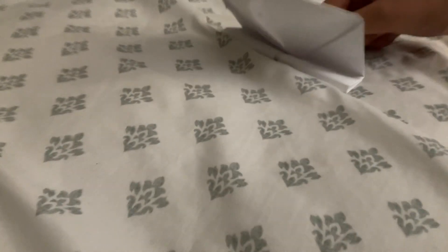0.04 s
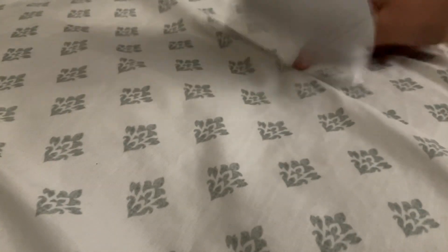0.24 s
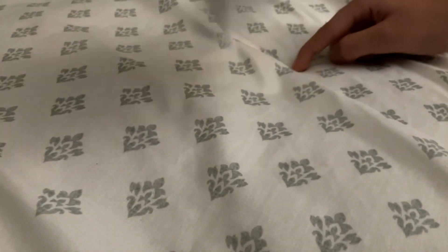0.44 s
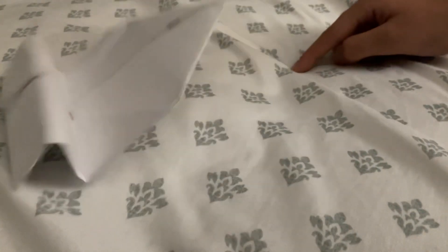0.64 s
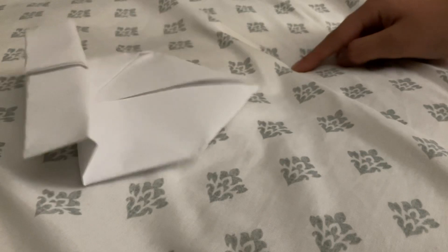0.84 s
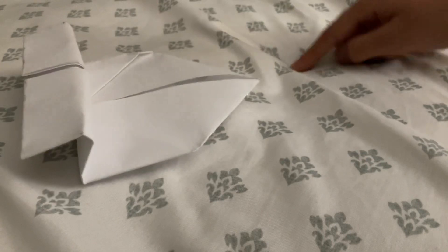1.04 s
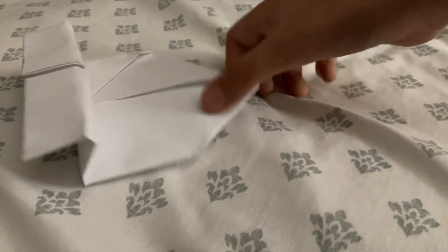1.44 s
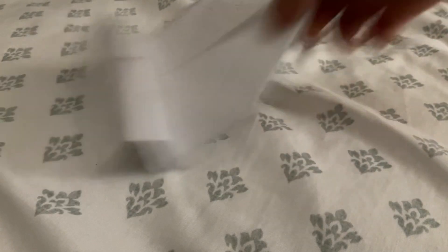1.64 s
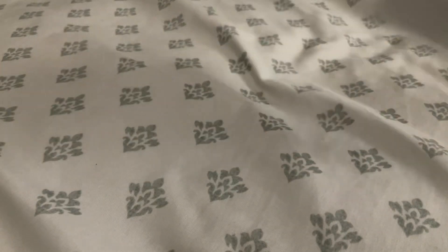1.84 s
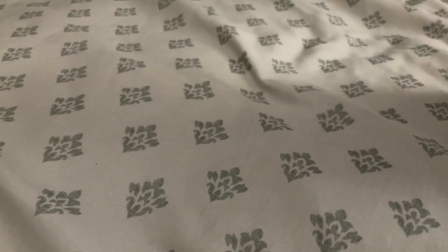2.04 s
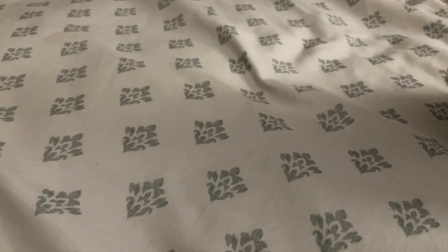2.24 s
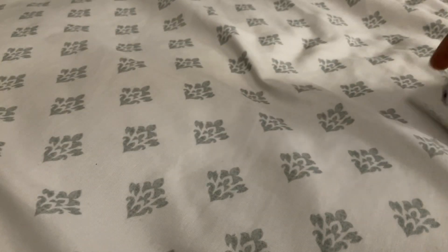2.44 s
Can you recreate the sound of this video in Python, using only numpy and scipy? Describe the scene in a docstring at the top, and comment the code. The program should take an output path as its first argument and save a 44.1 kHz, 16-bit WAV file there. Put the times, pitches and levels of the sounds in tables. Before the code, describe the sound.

Stiff folded paper creases and snaps as a toy jumps, landing with dull taps on a mattress. After a pause, a hand rustles the paper and rubs and pats the sheet, heard up close in a small, quiet room.

```python
"""Paper creases tick over a faint rustle of cotton: a finger presses a folded frog down on a bed, close to
the microphone in a small room. The frog slips free with a snap that rings its stiff paper, lands and
bounces on the sheet, and the mattress answers with soft, falling thumps. Then a hand slides hissing over
the weave, picks the frog up and brushes and taps the bed."""
import sys
import numpy as np
from scipy import signal
from scipy.fft import rfft, irfft, next_fast_len
from scipy.io import wavfile
from scipy.ndimage import map_coordinates

SR = 44100
rng = np.random.default_rng(int(sys.argv[2]) if len(sys.argv) > 2 else 0)


def materialize(psi):
    """Save the field psi as 16-bit PCM at rate SR to the path in sys.argv[1].

    A 1-D psi becomes a single channel; in a 2-D psi each row is a channel.
    """
    bounded = np.clip(np.atleast_2d(psi).T, -1, 1)
    quanta = np.round(bounded * 32767).astype(np.int16)
    wavfile.write(sys.argv[1], SR, quanta)


N = 110250  # 2.5 s

# The low shudder of the bed. Each row: frequency in Hz, relative level in dB.
BED_COLOUR = [(25, -20), (60, -7.5), (100, 1), (190, 0.5), (330, -7), (700, -21.5), (2000, -56.5)]


def amp(db):
    """Decibels to gain."""
    return 10 ** (np.asarray(db) / 20)


def unit(x):
    """x scaled to rms 1."""
    return x / np.sqrt(np.mean(x ** 2) + 1e-20)


def along(points, hz):
    """Interpolate (Hz, value) points on a log frequency axis."""
    freqs, values = np.transpose(points)
    return np.interp(np.log(hz + 1), np.log(freqs + 1), values)


def curves(rows):
    """One value per sample for each column after the time."""
    times, *columns = np.transpose(rows)
    return [np.interp(np.arange(N) / SR, times, column) for column in columns]


def wobble(rate):
    """A smooth random curve, rate knots a second."""
    return map_coordinates(rng.standard_normal(N // 10), [np.arange(N) * rate / SR], mode="wrap")


def filtered(x, response):
    """x through a response given as a function of Hz."""
    size = next_fast_len(N + SR // 2)
    return irfft(rfft(x, size) * response(np.fft.rfftfreq(size, 1 / SR)), size)[:N]


def coloured(x, colour, tilt_db=0, peak_hz=1000, boost_db=0, width_octaves=0.22, size=4096):
    """x through a causal filter of unit energy, tilted per octave and with one broad resonance."""
    hz = np.fft.rfftfreq(size, 1 / SR)
    octaves = np.log2(np.maximum(hz, colour[1][0]) / peak_hz)
    bump_db = boost_db * np.exp(-.5 * (octaves / width_octaves) ** 2)
    cepstrum = irfft(np.log(amp(along(colour, hz) + tilt_db * octaves + bump_db)))
    cepstrum[1:size // 2] *= 2  # fold to minimum phase
    cepstrum[size // 2 + 1:] = 0
    impulse = irfft(np.exp(rfft(cepstrum)))
    return signal.fftconvolve(x, impulse / np.linalg.norm(impulse))[:len(x)]


def add(out, start, x):
    """Mix x into out at start seconds."""
    part = out[max(0, round(start * SR)):][:len(x)]
    part += x[:len(part)]


def friction(size, fibres_per_s=2000, spread_db=3, share=0.42):
    """Fine noise of rms 1; the tiny catches of single fibres carry a share of its power."""
    caught = rng.random(size) < fibres_per_s / SR
    strength = amp(spread_db * np.minimum(rng.exponential(size=size), 4))
    catches = unit(caught * strength * rng.choice([-1, 1], size))
    return np.sqrt(share) * catches + np.sqrt(1 - share) * rng.standard_normal(size)


def patchy(x, depth_db=2.1, patch_hz=885, patch_s=.05, size=512):
    """Random patches of gain over pitch and time, as the contact keeps changing; rms 1."""
    hz, t, spectrum = signal.stft(x, SR, nperseg=size)
    grid = np.meshgrid(hz / patch_hz, t / patch_s, indexing="ij")
    patches = map_coordinates(rng.standard_normal((size, size)), grid)
    return unit(signal.istft(spectrum * amp(depth_db * patches), nperseg=size)[1][:N])


def blows(rows, colour, crack, attack_s):
    """Each blow is one sharp pulse and a shiver of the surface that dies by 60 dB over its fade."""
    out, t = np.zeros(N), np.arange(SR // 5) / SR
    for start, db, fade, *tone in rows:
        blow = rng.standard_normal(len(t)) * amp(-60 * t / fade) * (1 - np.exp(-t / attack_s))
        blow[0] += crack
        add(out, start, amp(db) * coloured(blow, colour, *tone))
    return out


def sheet():
    """Skin and paper rub the cotton: a bright hiss, and a duller rub where the hand bears down."""
    # The course of each layer. Each row: time in seconds, level in dB.
    hiss_levels = [(0, -70.5), (.09, -74), (.2, -66.5), (.4, -88.5), (.74, -78.5), (.798, -67),
                   (.85, -77.5), (.93, -81.5), (1.02, -74), (1.075, -62.5), (1.125, -76), (1.165, -66.5),
                   (1.25, -70.5), (1.345, -56.5), (1.45, -62), (1.54, -50.5), (1.59, -56), (1.66, -49.5),
                   (1.735, -54.5), (1.79, -48), (1.855, -60), (1.91, -63), (1.93, -86), (1.972, -96),
                   (1.984, -52.5), (2.06, -56.5), (2.15, -53.5), (2.2, -43.5), (2.245, -46.5), (2.285, -51),
                   (2.345, -47), (2.385, -54), (2.41, -45), (2.435, -66), (2.462, -76), (2.475, -53.5),
                   (2.5, -65)]
    rub_levels = [(1.0, -82), (1.074, -70.5), (1.125, -72.5), (1.17, -68.5), (1.254, -74), (1.338, -57.5),
                  (1.37, -62.5), (1.6, -64), (1.69, -55.5), (1.735, -73), (1.762, -55), (1.83, -83),
                  (1.862, -85), (1.89, -52), (1.935, -84), (2.06, -70), (2.122, -58), (2.16, -57.5),
                  (2.214, -48.5), (2.285, -61.5), (2.345, -49), (2.385, -54.5), (2.408, -54), (2.445, -77),
                  (2.5, -61)]
    # Their spectra. Each row: frequency in Hz, relative level in dB.
    hiss_colour = [(1500, -38.5), (3400, -11), (4400, -3.5), (5300, -1), (6200, -2.5), (8000, -0.5),
                   (10500, -6.5), (14000, -9), (16000, -10.5)]
    rub_colour = [(40, -11.5), (120, -12), (300, -3), (600, -2), (1500, 3.5), (2800, 2), (3800, -5.5),
                  (7000, -21)]
    drag_db = 1.3 * wobble(90)
    hiss = amp(curves(hiss_levels)[0] + drag_db) * patchy(coloured(friction(N), hiss_colour))
    rub = amp(curves(rub_levels)[0] + drag_db) * patchy(coloured(friction(N), rub_colour))
    return hiss + rub


def bedding():
    """The bedding rumbles as it shifts under the weight of the hand."""
    # Each row: time in seconds, level in dB.
    levels = [(0, -74), (.12, -82), (.2, -60.5), (.4, -84.5), (1.2, -86), (1.35, -73), (1.45, -79.5),
              (1.68, -67), (1.76, -76), (1.96, -83), (2.03, -65.5), (2.07, -78), (2.145, -57), (2.17, -65),
              (2.22, -58.5), (2.29, -65), (2.38, -71), (2.5, -64)]
    return amp(curves(levels)[0]) * coloured(rng.standard_normal(N), BED_COLOUR)


def creases():
    """Creases give way under the finger, each with a dry tick."""
    # Each row: start in seconds, level in dB, fade in seconds, tilt in dB per octave,
    # pitch of the paper panel in Hz, its boost in dB.
    ticks = [(.0279, -30, 0.004, 3, 7170, 7.5), (.1372, -35, 0.021, 2, 2400, 1),
             (.1432, -42, .03, -2.5, 5600, 14.5), (.163, -39, 0.039, 1.5, 5970, -4),
             (.1832, -36, 0.03, -1, 2650, 1.5), (.2013, -37.5, 0.011, -2.5, 2000, -2.5),
             (1.5638, -33.5, 0.0054, 1.5, 7880, 24), (1.8768, -40, 0.0084, -2, 5260, 18),
             (1.6895, -27.5, 0.0063, 4, 5600, -3.5), (2.196, -38, .004, 0.5, 5000, 14)]
    # The spectrum of a tick. Each row: frequency in Hz, relative level in dB.
    colour = [(100, -25), (250, -4.5), (950, -11), (2500, 2), (3600, -7), (5800, -3), (7600, -4),
              (9300, -10), (15500, -17.5)]
    return blows(ticks, colour, crack=4, attack_s=0.00053)


def mattress(sag_hz=400, sag_s=.011, swell_s=0.029, jitter=0.2, shudder_db=-10.5):
    """A push spreads through the bed, high ripples first, so each thump falls in pitch as it shudders."""
    # Each row: start in seconds, level in dB, final pitch in Hz, fade in seconds.
    pushes = [(0.127, -57, 83, 0.32), (.238, -40.5, 59, .13), (0.5257, -41, 50, 0.098),
              (.63, -47.5, 76.5, 0.27), (0.681, -59.5, 55, 0.19), (1.555, -57, 105, .12),
              (1.67, -53, 67, 0.13), (1.786, -66.5, 69, 0.095), (1.869, -55.5, 82.4, 0.17),
              (2.071, -54.5, 97, 0.17), (2.191, -63, 78.4, .2), (2.397, -53, 81, 0.066)]
    out, t = np.zeros(N), np.arange(N // 6) / SR
    for start, db, end_hz, fade in pushes:
        hz = (end_hz + sag_hz * np.exp(-t / sag_s)) * (1 + jitter * wobble(140)[:len(t)])
        thump = np.sin(2 * np.pi * np.cumsum(hz) / SR)
        shudder = amp(shudder_db) * coloured(rng.standard_normal(len(t)), BED_COLOUR)
        swell = np.minimum(t / swell_s, 1) ** .6
        decay = amp(-60 * np.maximum(t - swell_s, 0) / fade)
        add(out, start, amp(db) * swell * decay * (thump + shudder))
    return out


def scrapes():
    """Paper drags on finger or cloth in short swells of friction."""
    # Each row: peak time in seconds, level in dB, rise and fall in seconds, tilt in dB per octave,
    # pitch of the scrape in Hz, its boost in dB.
    swells = [(.238, -36, 0.011, 0.052, -1.5, 5520, 3), (0.5291, -37.5, 0.013, 0.014, 0, 6000, 1.5),
              (.634, -53.5, 0.013, .06, -0.5, 9000, 11), (.658, -50, .04, 0.033, -1.5, 8400, 5),
              (0.711, -64.5, 0.06, 0.085, 1.5, 6960, -4), (1.69, -38.5, .05, 0.061, 1.5, 6580, 2),
              (1.76, -39.5, 0.017, 0.064, 3.5, 9700, 5), (1.776, -44, 0.038, 0.038, 8, 13000, 19),
              (1.878, -41, 0.019, 0.059, -2.5, 5320, 19), (1.901, -44.5, 0.051, 0.027, 2, 5200, 4),
              (2.023, -48, 0.028, .04, 1.5, 5200, 10.5), (2.215, -44, 0.074, 0.072, -0.5, 6800, 5.5),
              (2.245, -43, 0.043, 0.065, 4, 5100, 5)]
    # The spectrum of a scrape. Each row: frequency in Hz, relative level in dB.
    colour = [(150, -25), (300, -3), (550, -7), (1000, -6.5), (2800, -8), (3450, -8.5), (6250, -5),
              (10800, -10.5), (15500, -19)]
    out, t = np.zeros(N), np.arange(-SR // 5, SR // 5) / SR
    for peak_s, db, rise, fall, *tone in swells:
        shape = amp(40 * np.minimum(t / rise, -t / fall))
        add(out, peak_s + t[0], amp(db) * coloured(shape * friction(len(t)), colour, *tone))
    return out


def snap():
    """The frog slips free: its folds flick open and ring the stiff paper."""
    # Each row: start in seconds, relative level in dB, fade in seconds, tilt in dB per octave,
    # pitch of the paper panel in Hz, its boost in dB.
    folds = [(.2413, -25, 0.012, -1.5, 6300, 8), (.2448, -19.5, 0.0091, 1.5, 5500, 3),
             (.2464, -24, 0.021, -3.5, 280, 8), (.2514, -22, 0.014, 3.5, 11000, 3.5),
             (.2528, -13.5, 0.013, -0.5, 4400, 4), (.2538, -18, 0.012, 1.5, 8500, 11),
             (.2607, -24, 0.02, -3, 1200, 1.5), (.279, -40, 0.018, -1, 2000, 7)]
    # The spectrum of a flick. Each row: frequency in Hz, relative level in dB.
    colour = [(71, -41), (120, -16.5), (288, -10.5), (662, -13), (1350, -6), (1530, -14), (2390, -7),
              (3050, -4), (3370, -16), (4390, -4), (5720, -6.5), (6330, -7.5), (7160, -10.5), (9320, -14),
              (15500, -24.5)]
    # The paper's resonances. Each row: centre in Hz, width in Hz, gain in dB.
    modes = [(265, 41, -4), (840, 60, -1), (1017, 70, -0.5), (1410, 67, 1.5), (1760, 97, 1), (1980, 120, 1),
             (2510, 71, 0), (4230, 200, -1), (5110, 300, -5), (7740, 120, -1)]
    flicks = blows(folds, colour, crack=2.88, attack_s=.0002)
    ring = filtered(flicks, lambda hz: sum(
        amp(db) * 1j * hz * width / (centre ** 2 - hz ** 2 + 1j * hz * width)
        for centre, width, db in modes))
    return amp(-2.5) * flicks + ring


def taps():
    """The bouncing frog, and later the fingers, strike the sheet with dull knocks."""
    # Each row: start in seconds, level in dB, fade in seconds, tilt in dB per octave,
    # pitch of the knock in Hz, its boost in dB.
    knocks = [(.5203, -46.5, 0.025, 2, 1300, -2), (.5265, -36, 0.027, -4.5, 422, 5.5),
              (.6289, -40.5, 0.019, 0.5, 1000, 6), (.6386, -42.5, 0.0071, 2, 900, 7),
              (.6448, -48, 0.02, -1, 900, 3), (.707, -56, .02, -2, 500, 8),
              (1.32, -54, 0.044, -5.5, 900, 18), (1.335, -58, 0.065, 0, 860, 4),
              (1.561, -48.5, 0.042, -1.5, 458, -2), (1.641, -49, .025, 1, 587, 8),
              (1.672, -39.5, 0.021, -2, 640, 9), (1.754, -54, 0.026, 3, 1300, 13),
              (1.791, -47, 0.031, -1.5, 750, 5), (1.8765, -41.5, .016, 5, 1410, 5),
              (1.982, -54.5, .04, 1.5, 300, 17.5), (2.079, -48, 0.082, 5, 593, 4),
              (2.1355, -36.5, 0.05, -1.5, 370, 5.5), (2.137, -42.5, 0.041, 1, 1180, 2),
              (2.194, -44, 0.045, -0.5, 705, 9), (2.263, -49, 0.047, 2, 328, 10),
              (2.399, -38.5, 0.06, 1.5, 1620, 3), (2.402, -36.5, 0.016, 6.5, 1180, 23.5),
              (2.471, -55, 0.073, 2, 1500, -7)]
    # The spectrum of a knock. Each row: frequency in Hz, relative level in dB.
    colour = [(71, -45.5), (120, -2.5), (345, 2.5), (602, -1), (1660, -2.5), (2030, -8), (3020, -8.5),
              (3470, -16.5), (6310, -17), (14000, -24)]
    return blows(knocks, colour, crack=7.5, attack_s=0.000626)


def weave(jitter=0.073):
    """A fingertip sings across the threads, a fuzzy whistle whose pitch follows its speed."""
    # One list a stroke. Each row: time in seconds, threads crossed per second, level in dB.
    strokes = [
        [(1.265, 470, -75), (1.315, 576, -61), (1.335, 950, -54), (1.352, 780, -61), (1.368, 370, -66),
         (1.39, 370, -62.5), (1.42, 550, -70.5), (1.48, 550, -63.5), (1.52, 250, -69)],
        [(1.635, 1400, -64), (1.648, 1630, -53.5), (1.663, 2500, -63), (1.675, 3300, -70)],
    ]
    out, t = np.zeros(N), np.arange(N) / SR
    for stroke in strokes:
        hz, db = curves(stroke)
        phase = 2 * np.pi * np.cumsum(hz * (1 + jitter * wobble(500))) / SR
        touching = (t > stroke[0][0]) & (t < stroke[-1][0])
        out += amp(db + 2.2 * wobble(150)) * np.sin(phase) * touching
    return out


def room_echo(x, delay_s=0.0072, size=128):
    """A diffuse bedroom echo: the energy at each frequency lingers as noise and dies at its own speed."""
    # Each row: frequency in Hz, seconds to die away by 60 dB.
    decay_times = [(100, 0.28), (500, 0.2), (2000, 0.19), (5000, 0.23), (9000, 0.18), (15000, .17)]
    hz, t, spectrum = signal.stft(x, SR, nperseg=size)
    decay = amp(-60 * t / along(decay_times, hz)[:, None]) ** 2
    decay /= decay.sum(1, keepdims=True)
    power = np.abs(signal.fftconvolve(np.abs(spectrum) ** 2, decay, axes=1))[:, :len(t)]
    noise = signal.stft(rng.standard_normal(N), SR, nperseg=size)[2]
    out = np.zeros(N)
    add(out, delay_s, signal.istft(np.sqrt(power) * noise / noise.std(), SR, nperseg=size)[1])
    return out


def room_tone(level_db=-78):
    """The quiet of the room, a faint steady noise under everything."""
    # Each row: frequency in Hz, relative level in dB.
    colour = [(18, -44), (30, -2), (144, -1.5), (546, -8.5), (606, -12.5), (709, -17), (1020, -13.5),
              (1290, -15.5), (1470, -10), (1820, -22.5), (7080, -18), (15500, -24.5)]
    return amp(level_db) * coloured(rng.standard_normal(N), colour)


def scene():
    """Frog, bed and hand close to one microphone, with a little of the room behind them."""
    near = snap() + creases() + scrapes() + taps() + mattress() + bedding() + sheet() + weave()
    return (near + room_tone() + amp(-17.5) * room_echo(near))[None]


def record(dry, low_cut_hz=42, top_hz=16250):
    """The microphone drops the deep bass and keeps nothing above its band limit."""
    x = signal.sosfilt(signal.butter(5, low_cut_hz, "high", fs=SR, output="sos"), dry[0])
    return filtered(x, lambda hz: np.clip((top_hz - hz) / 500, 0, 1) ** 2)[None]


dry = scene()
out = record(dry)
materialize(out)
```